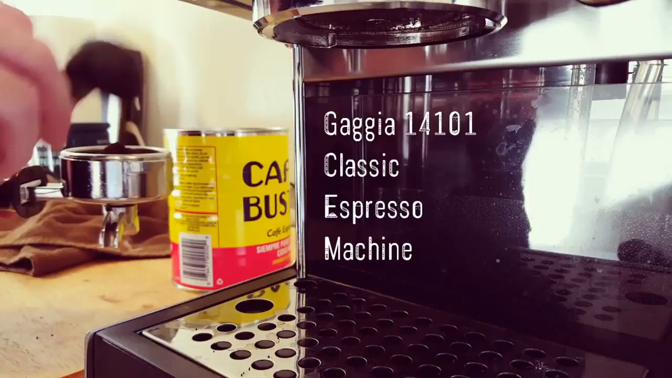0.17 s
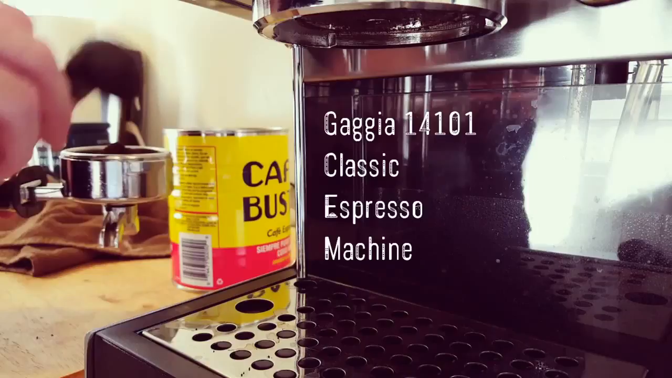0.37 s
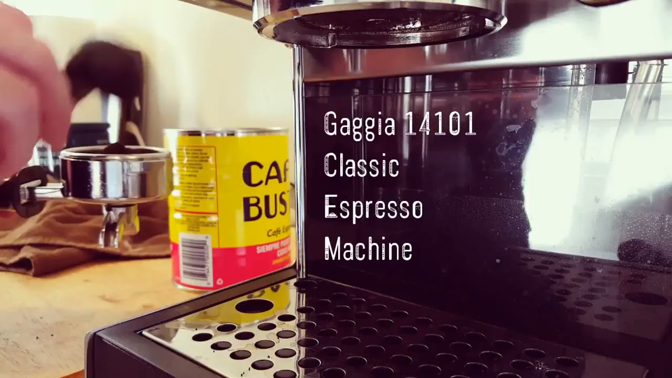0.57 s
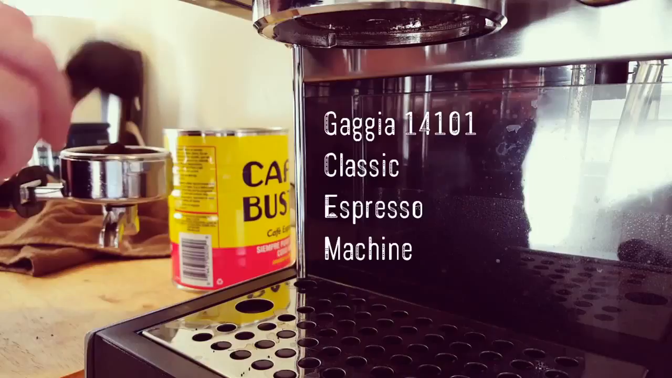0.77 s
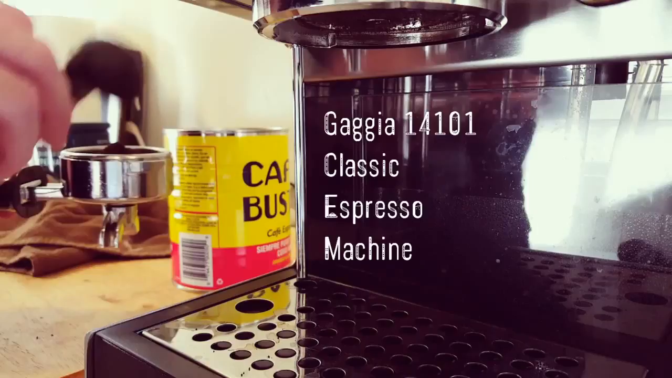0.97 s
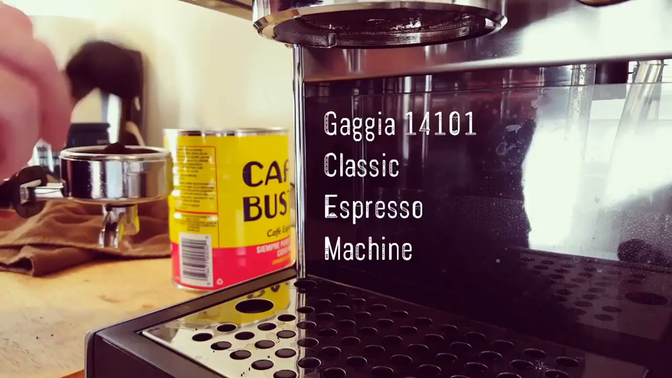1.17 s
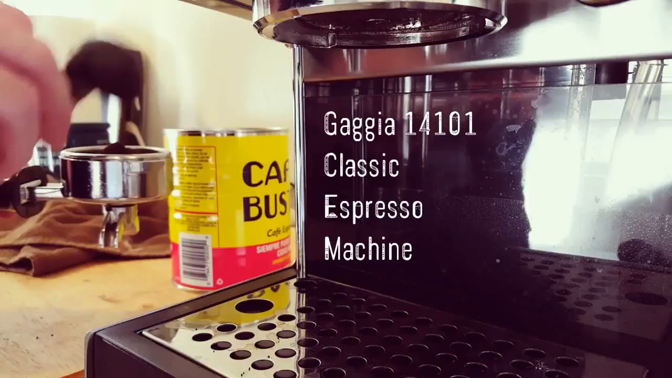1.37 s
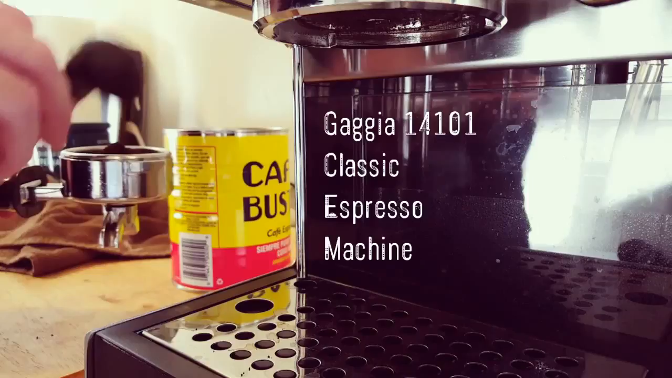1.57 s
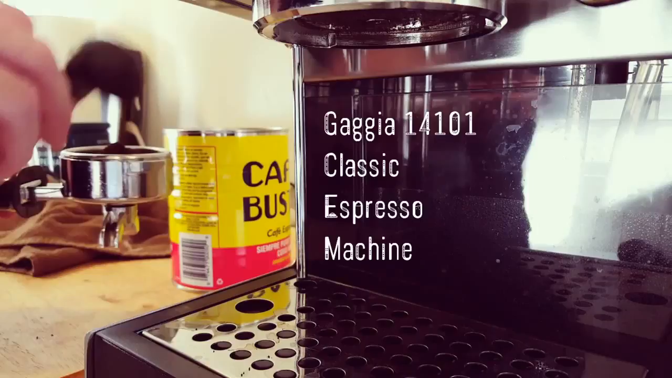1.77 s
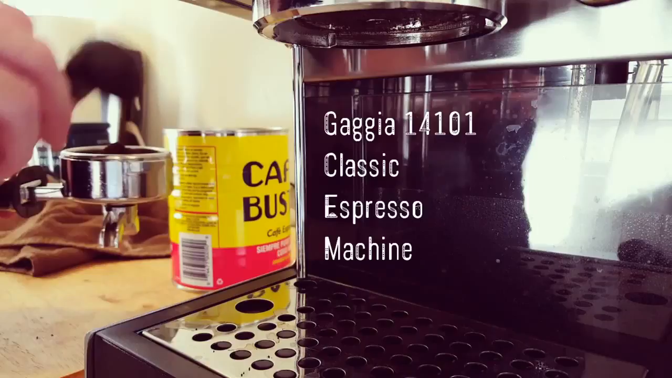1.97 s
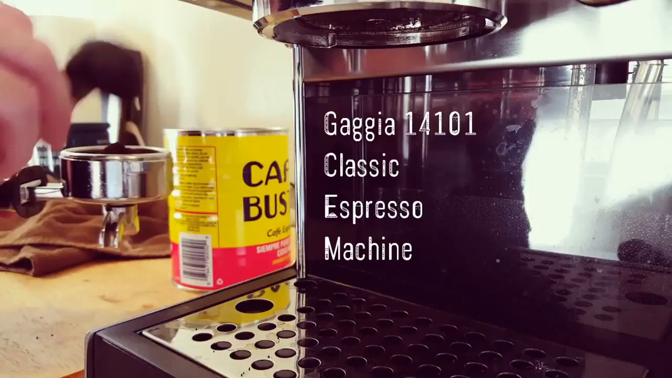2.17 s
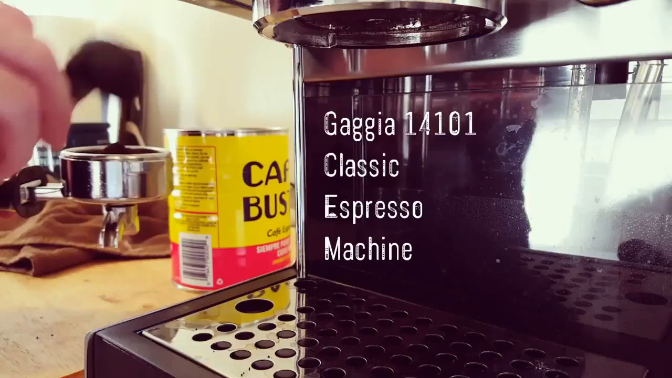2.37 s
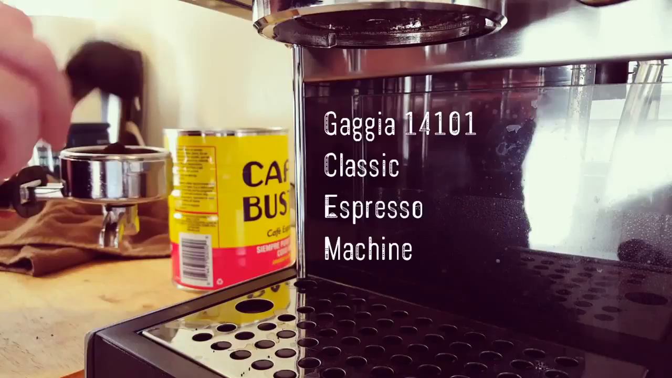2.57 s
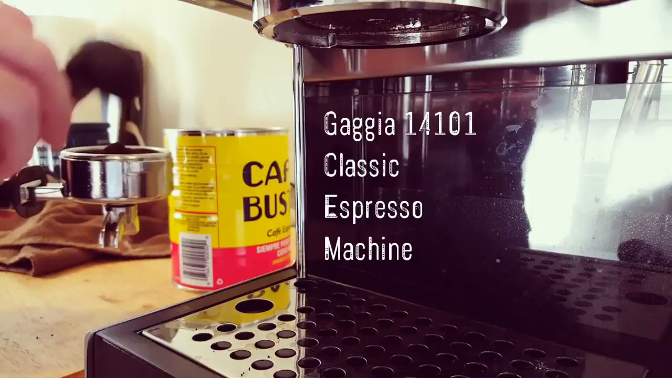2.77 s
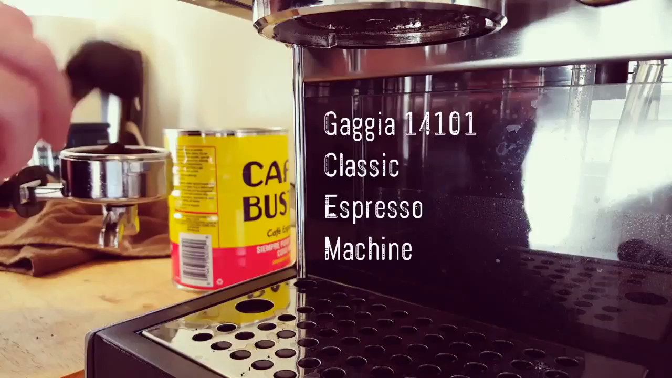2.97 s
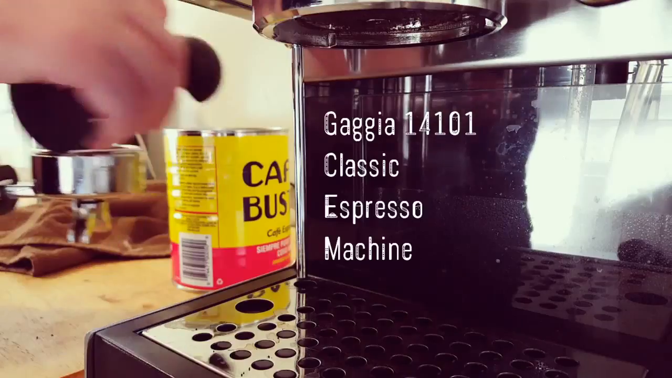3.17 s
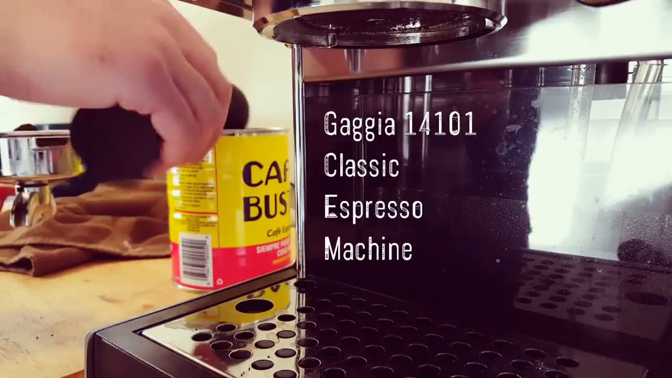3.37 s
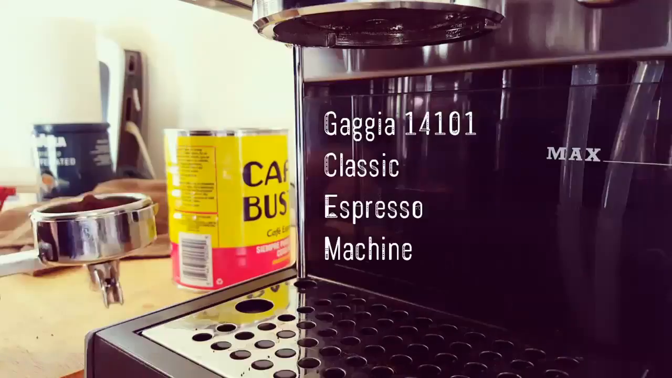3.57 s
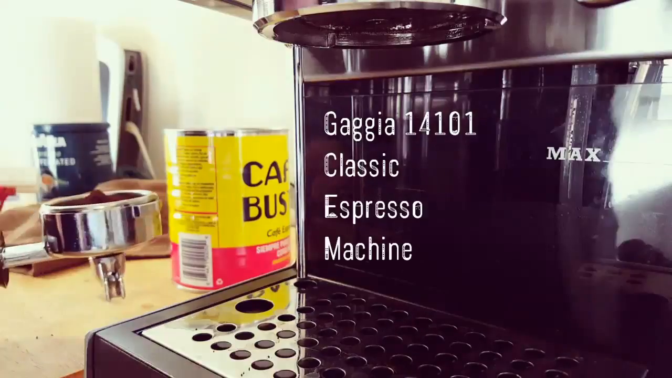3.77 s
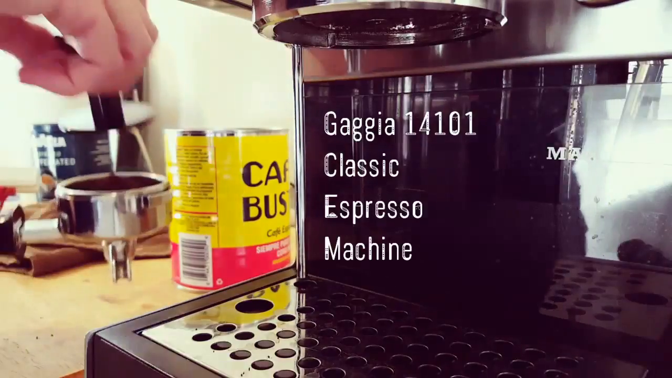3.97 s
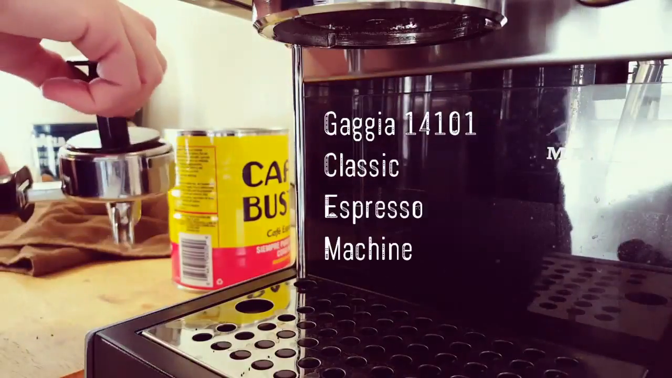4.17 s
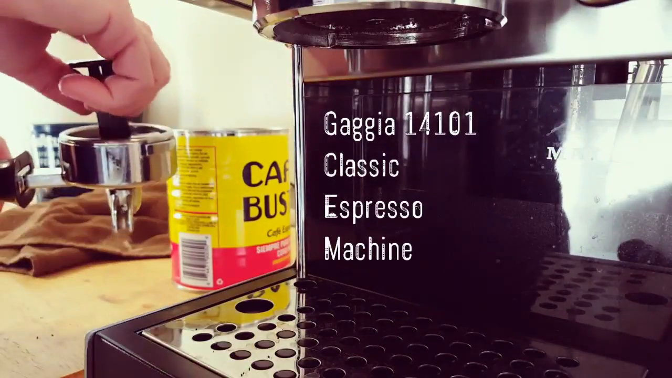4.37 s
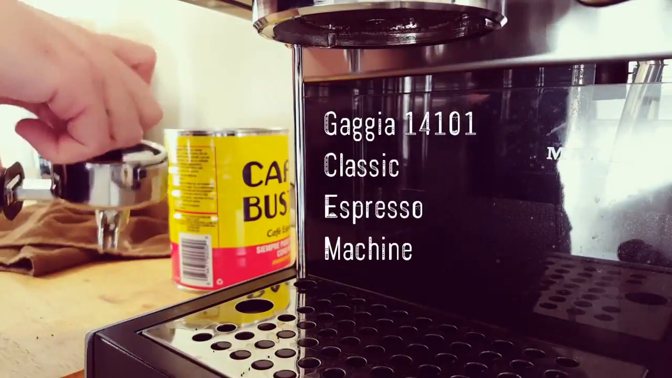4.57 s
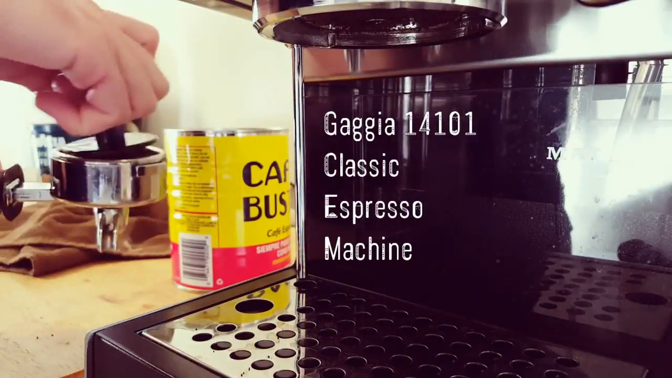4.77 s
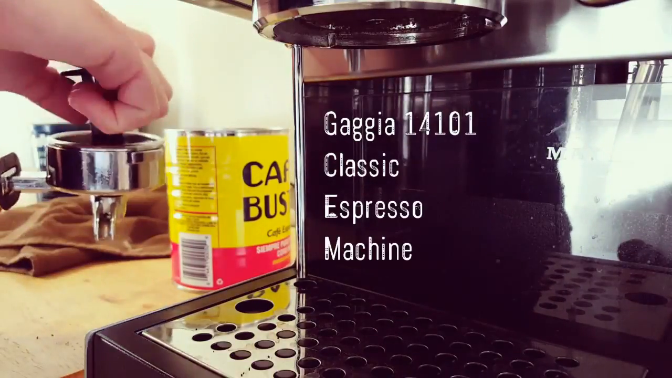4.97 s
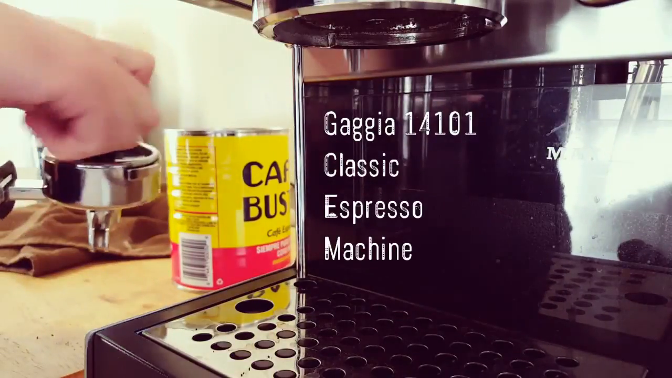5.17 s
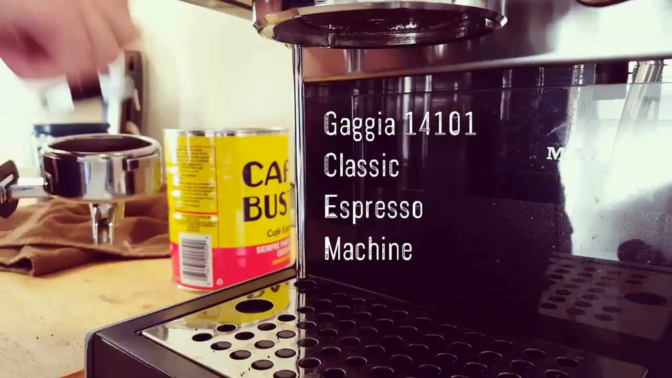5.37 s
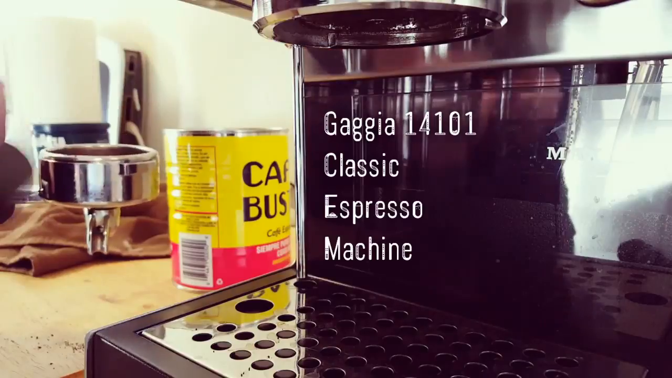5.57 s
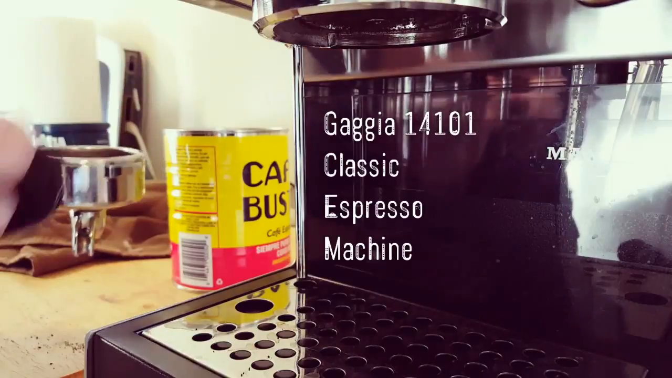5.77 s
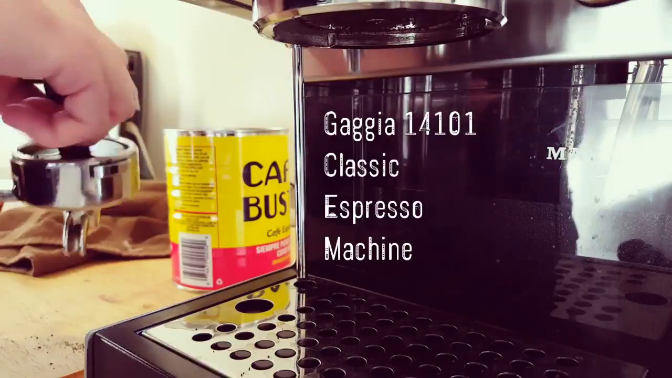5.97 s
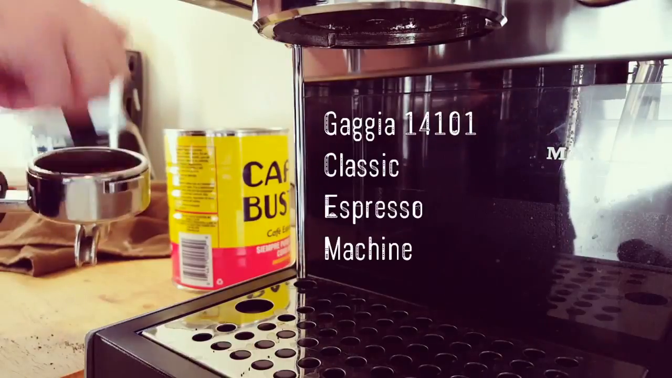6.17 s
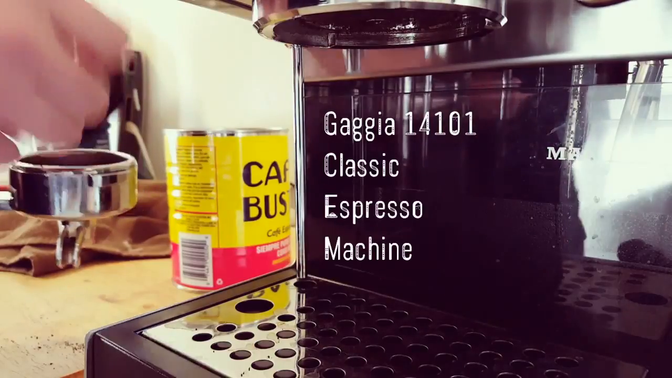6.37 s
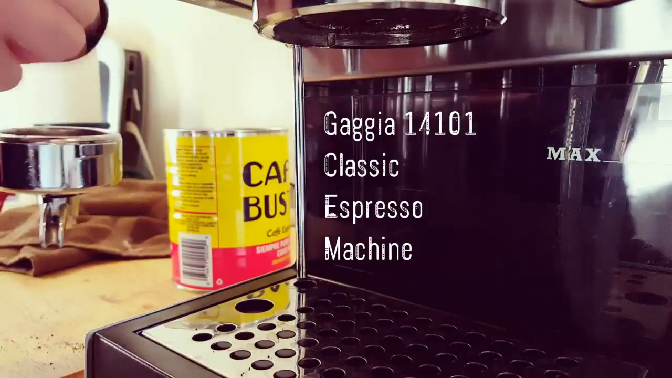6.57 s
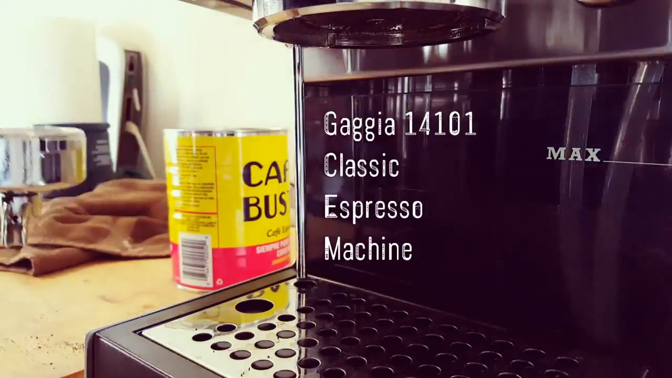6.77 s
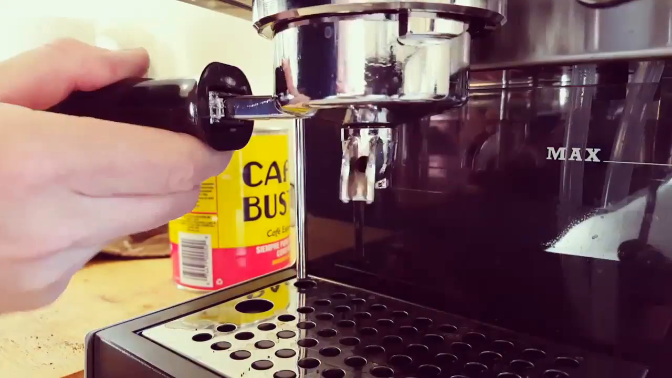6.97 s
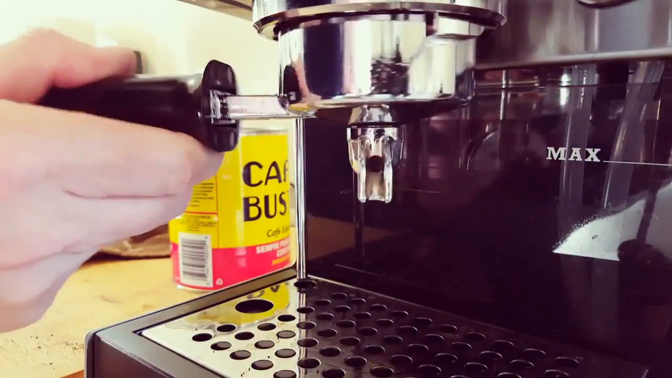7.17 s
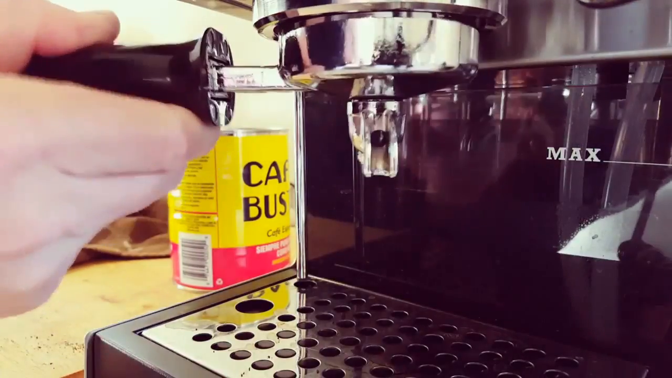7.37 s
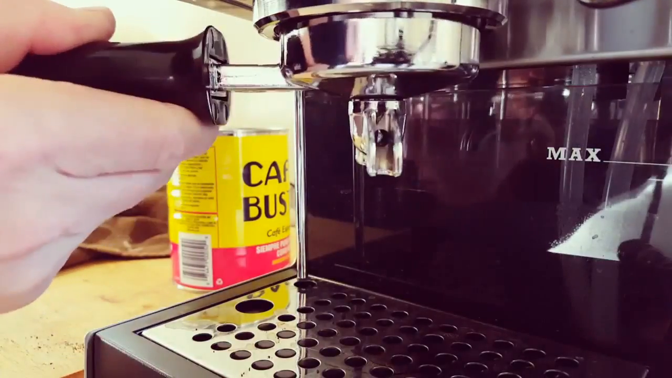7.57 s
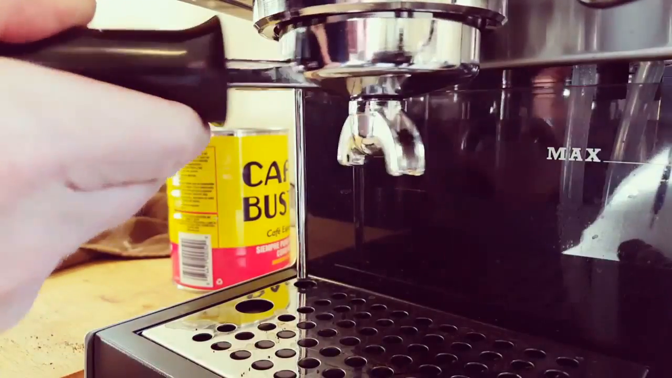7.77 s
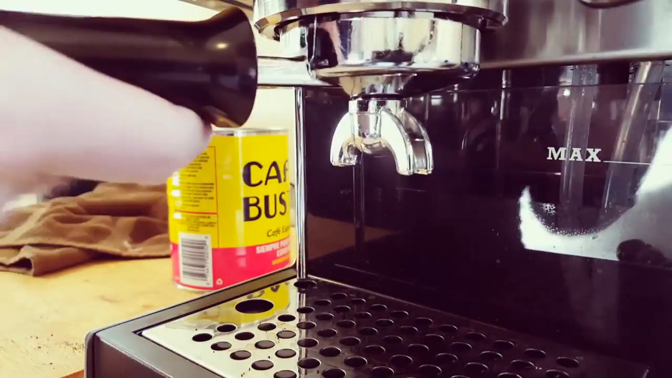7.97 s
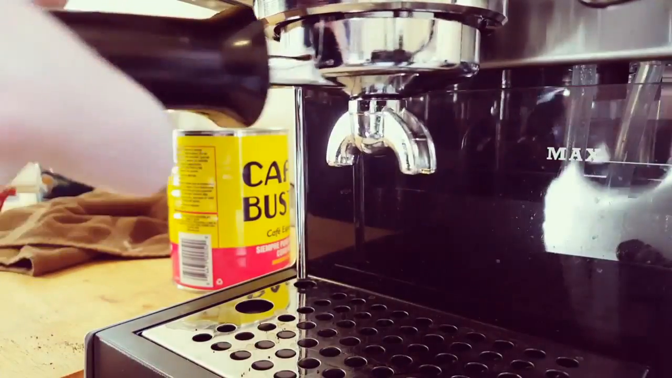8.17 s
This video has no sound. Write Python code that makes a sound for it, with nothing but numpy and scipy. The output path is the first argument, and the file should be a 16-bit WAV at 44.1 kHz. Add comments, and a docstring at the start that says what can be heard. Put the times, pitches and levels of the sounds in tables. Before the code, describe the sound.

Coffee-making handling heard close, slightly left, with short room reflections. Low air and a quiet unsteady hum sit underneath. Dull bumps lead to light bright taps of tin and scoop, then a gap, quickening hard taps on a metal basket, and three strong tin knocks. A scoop settles with muffled rubbing, faint grounds rustle, a tamper clicks, and metal lugs knock, grind and lock with a low casing boom.

```python
"""Small kitchen, two microphone ports a few centimetres apart, the taps arriving first at the left one.
Air and an appliance's wavering tones, then soft bumps; from 0.46 s tin knocks and scoop taps, at 2.5 s basket taps.
At 3.35 s the scoop is knocked clean on the tin and dropped in; it shifts there, and at 6.05 s the tamper taps.
From 6.93 s the handle is twisted into the machine with clunks and scraping, as the hum gives way to deeper air.
Blows are short forces on sets of resonances plus a crack and room; hum is sines, air and rubbing are noise."""
import sys
import numpy as np
from scipy import signal
from scipy.fft import rfft, irfft, next_fast_len
from scipy.io import wavfile
from scipy.ndimage import uniform_filter1d, map_coordinates

SR = 44100
rng = np.random.default_rng(int(sys.argv[2]) if len(sys.argv) > 2 else 0)


def generate_wav(sig):
    """Save sig (samples, or channels by samples) to the path in sys.argv[1] as 16-bit PCM at SR."""
    pcm = np.round(np.clip(np.atleast_2d(sig).T, -1, 1) * 32767).astype(np.int16)
    wavfile.write(sys.argv[1], SR, pcm)


def elevation(decibels):
    """Turn decibel levels (scalar or array-like) into linear amplitude ratios."""
    levels = np.asarray(decibels, float)
    return 10 ** (levels / 20)


N = 362502


def unit(x):
    """Scale to rms 1."""
    return x / np.sqrt(np.mean(x ** 2) + 1e-20)


def along(points, hz):
    """Read a curve of (f/Hz, value) points on a log frequency axis."""
    f, v = np.transpose(points)
    return np.interp(np.log(hz + 1), np.log(f + 1), v)


def gains(rows):
    """A (t/s, level/dB) curve as gain per sample, -120 dB outside the table."""
    s, db = np.transpose(rows)
    return elevation(np.interp(np.arange(N) / SR, s, db, -120, -120))


def strokes(rows, rise_db_per_s, fall_db_per_s):
    """Gain of movements (t/s, hold/s, level/dB) that swell to their level, hold it and die away."""
    t = np.arange(N) / SR
    total = 0
    for start, hold, db in rows:
        before = np.maximum(start - t, 0)
        after = np.maximum(t - start - hold, 0)
        total = total + elevation(db - rise_db_per_s * before - fall_db_per_s * after)
    return total


def wobble(rate):
    """A smooth random curve, rate knots a second."""
    knots = rng.standard_normal(int(N * rate / SR) + 4)
    return map_coordinates(knots, [np.arange(N) * rate / SR])


def filtered(x, response):
    """x times a complex response of frequency."""
    m = next_fast_len(x.shape[-1] + 8192)
    spectrum = rfft(x, m) * response(np.fft.rfftfreq(m, 1 / SR))
    return irfft(spectrum, m)[..., :x.shape[-1]]


def modes(table, scatter_db=0):
    """Causal response of resonances (f/Hz, width/Hz, level/dB), each excited a little differently."""
    scatter = scatter_db * rng.standard_normal(len(table))

    def warp(hz):  # bilinear frequency warping
        return SR / np.pi * np.tan(np.pi * np.minimum(hz / SR, .4999))

    def response(hz):
        f = warp(hz)
        total = 0
        for k, (centre, width, db) in enumerate(table):
            c = warp(centre)
            w = warp(centre + width / 2) - warp(centre - width / 2)
            resonance = 1j * f * w / (c * c - f * f + 1j * f * w)
            total = total + (-1) ** k * elevation(db + scatter[k]) * resonance
        return total

    return response


# how alike a diffuse field is at the two ports: f/Hz, likeness (1 = identical)
PORT_LIKENESS = [(60, 0.98), (130, 0.92), (290, 0.99), (640, 0.73), (1410, 0.33), (3100, -0.087),
                 (6820, -0.093), (15000, -0.11)]


def half_angle(hz):
    """Mixing angle that gives two signals the likeness of the ports."""
    return np.arccos(np.clip(along(PORT_LIKENESS, hz), -1, 1)) / 2


def ports(pair):
    """Two unrelated signals mixed as a diffuse field reaches the ports: alike in the bass only."""
    mid, side = filtered(pair, lambda hz: np.array([np.cos(half_angle(hz)), np.sin(half_angle(hz))]))
    return np.array([mid + side, mid - side])


def rush(spectrum, patchy_db):
    """Diffuse noise of rms 1 with smooth patches of random gain over time and frequency."""
    z = signal.stft(rng.standard_normal((2, N)), nperseg=512)[2]
    field = uniform_filter1d(rng.standard_normal(z.shape[1:]), size=6, axis=0)
    field = uniform_filter1d(field, size=14, axis=1)
    pair = signal.istft(z * elevation(patchy_db * unit(field)), nperseg=512)[1][:, :N]
    return unit(ports(filtered(pair, lambda hz: elevation(along(spectrum, hz)))))


# dying time of the room's answer: f/Hz, t60/s
KITCHEN_T60 = [(200, 0.44), (500, 0.16), (1300, 0.13), (3500, .16), (9000, 0.13), (16000, 0.13)]


def kitchen(x):
    """A fresh answer of the walls, each frequency dying at its own speed."""
    hz, t, z = signal.stft(rng.standard_normal((2, SR // 4)), SR, nperseg=256)
    decay = elevation(-60 * t / along(KITCHEN_T60, hz)[:, None])
    tail = ports(signal.istft(z * decay, SR, nperseg=256)[1])
    tail *= np.clip(np.arange(tail.shape[1]) / SR / .004, 0, 1)  # builds up as more surfaces join
    return signal.fftconvolve(x[None], tail / np.linalg.norm(tail[0]), axes=1)


def peak_one(x):
    """Scale to peak 1."""
    return x / abs(x).max()


def blows(events, body, crack, crack_db, crack_grows, lag_s, rough=0, scatter_db=1.5):
    """Each contact pushes the body's modes with a short force, cracks and fills the room."""
    firm_blow_db = -10  # strength at which the crack has its stated level
    out, t = np.zeros((2, N + SR)), np.arange(SR // 5) / SR
    for s, db, pan_db, room_db, ms in events:
        force = np.exp(-1000 * t / ms) * (1 + rough * rng.standard_normal(len(t)))
        ring = filtered(force, modes(body, scatter_db))
        grit = (t == 0) + 0.25 * np.exp(-t / 0.0015) * rng.standard_normal(len(t))
        snap = filtered(grit, modes([(*crack, 0)]))
        share = elevation(crack_db + crack_grows * (db - firm_blow_db))
        dry = elevation(db) * np.array([peak_one(ring), share * peak_one(snap)])
        # no deep bass, soft top
        dry = filtered(dry, lambda hz: (1j * hz / (70 + 1j * hz)) ** 2 / (1 + 1j * hz / 14000))
        # ring and crack radiate in different directions, so each gets its own room answer
        heard = elevation(room_db) * (kitchen(dry[0]) + kitchen(dry[1]))
        pan = elevation([[pan_db / 2], [-pan_db / 2]])
        # the right port hears the blow lag_s later
        heard[:, :len(t)] += filtered(
            sum(dry), lambda hz: pan * np.exp(-2j * np.pi * hz * [[0], [lag_s]]))
        out[:, round(s * SR):][:, :heard.shape[1]] += heard
    return out[:, :N]


def rubbed(body, lumps_db, rate):
    """Uneven friction feeding a body's resonances, partly through the room; rms 1."""
    friction = elevation(lumps_db * wobble(rate)) * rng.standard_normal(N)
    drag = filtered(friction, modes(body))
    direct = drag * elevation([[1.1], [-1.1]])
    return unit(direct + elevation(4.5) * kitchen(drag)[:, :N])


# colour of the input noise: f/Hz, relative level/dB
HISS_COLOUR = [(1000, 22.5), (4000, -36.5), (9000, 4), (15500, 19), (16500, -12)]


def input_hiss():
    """Steady coloured noise, unrelated in the two channels."""
    noise = rng.standard_normal((2, N))
    return elevation(-70.0) * unit(filtered(noise, lambda hz: elevation(along(HISS_COLOUR, hz))))


# tones of the appliance: f/Hz, relative level/dB
HUM_TONES = [(209.9, -62.5), (236.9, -54.5), (285.3, -54.5), (355.3, -62), (425.3, -64), (473.7, -60),
             (721.4, -62.5), (823.6, -64), (1152, -64.5), (1416, -84), (1647, -70), (2471, -75),
             (2724, -68), (3887, -75.5)]


def appliance_hum():
    """Sines whose phase and level waver at random, phased apart between the ports."""
    t = np.arange(N) / SR
    hum = 0
    for hz, db in HUM_TONES:
        phase = 2 * np.pi * (hz * t + rng.random()) + 1.15 * wobble(4) + 0.56 * wobble(15)
        apart = half_angle(hz)
        hum = hum + elevation(db + 2.45 * wobble(9)) * np.sin(phase + np.array([[apart], [-apart]]))
    return elevation(-49) * unit(hum)


# a soft low drone: f/Hz, relative level/dB
DRONE_COLOUR = [(85, -15), (108, -7), (118, -2.5), (130, -5), (160, -44)]


def low_drone():
    """A narrow band of patchy diffuse noise in the bass."""
    return elevation(-69.5) * rush([(20, -120)] + DRONE_COLOUR + [(300, -120)], patchy_db=2.5)


# kitchen air while the hum sounds: f/Hz, relative level/dB
AIR_COLOUR = [(15, -72), (25, -24), (111, -31), (177, -12), (226, -6.5), (280, -3.5), (378, -7.5),
              (470, -9.5), (510, -9.5), (1180, -11), (1280, -16.5), (3700, -25), (7110, -30), (15200, -41),
              (16500, -60)]


def room_air():
    """Broad diffuse noise, strongest in the low middle."""
    return elevation(-49.5) * rush(AIR_COLOUR, patchy_db=.5)


# deeper air after the hum: f/Hz, relative level/dB
LATE_AIR_COLOUR = [(15, -59), (25, -38), (142, -4), (280, -14.5), (483, -18.5), (524, -13.5), (706, -36),
                   (1320, -25), (1640, -34), (2090, -30.5), (3910, -37.5), (12600, -48.5), (16500, -66)]


def background():
    """Air, hum and drone; at 6.95 s they fade within 0.05 s into a deeper air."""
    late = np.clip((np.arange(N) / SR - 6.95) / .05, 0, 1)
    early_sound = room_air() + appliance_hum() + low_drone()
    late_sound = elevation(-46) * rush(LATE_AIR_COLOUR, patchy_db=2.5)
    return np.sqrt(1 - late) * early_sound + np.sqrt(late) * late_sound


# a fingertip or rim catches: t/s, level/dB
FINGER_FLICKS = [(.124, -51.5), (.26, -55), (3.925, -62), (4.255, -65), (4.86, -60), (5.43, -59),
                 (7.862, -49.5)]
# fingers on grounds and handle: t/s, hold/s, level/dB
FINGER_BRUSHES = [(3.78, .12, -59), (4.345, .012, -64), (4.745, .015, -54.5), (5.16, .025, -57.5),
                  (5.27, .03, -60), (6.16, 0.021, -56), (6.25, 0.038, -58.5), (6.33, .06, -68),
                  (7.73, 0.027, -62), (7.93, 0.025, -55.5), (8.02, .12, -68)]
# colour of that rustle: f/Hz, relative level/dB
RUSTLE = [(2000, 0), (4000, -1), (6500, 5), (9500, -4.5), (13000, 0), (16000, -21)]


def brushing():
    """Fingers and tamper brush the grounds: lumpy diffuse noise under short swells."""
    flicks = strokes([(s, 0, db) for s, db in FINGER_FLICKS], rise_db_per_s=2500, fall_db_per_s=400)
    brushes = strokes(FINGER_BRUSHES, rise_db_per_s=254, fall_db_per_s=202)
    rustle = unit(elevation(2.7 * wobble(120)) * rush(RUSTLE, patchy_db=0.5))
    return (flicks + brushes) * rustle


# soft bumps: t/s, level/dB, left-right/dB, room/dB, force decay/ms
COUNTER_BUMPS = [(0.126, -32.5, 0, -3, 0.16), (0.179, -26, -1.5, -1, 0.45), (0.204, -36, -0.6, -9, 0.39),
                 (0.262, -35, 0, -4, 0.23), (1.599, -28.5, 1.5, -2.5, 0.11)]
# resonances of the counter: f/Hz, width/Hz, relative level/dB
COUNTER_MODES = [(330, 54, 1.5), (486, 100, 1.5), (667, 54, -1), (830, 76, 1.5), (1370, 560, -12),
                 (2020, 360, -3.5)]


def counter_bumps():
    """Dull, slightly rough pushes on the low modes of the counter."""
    return blows(COUNTER_BUMPS, COUNTER_MODES, crack=(2500, 4000), crack_db=1.5, crack_grows=0.86,
                 lag_s=.0001, rough=0.11)


# tiny metal contacts: t/s, level/dB, f/Hz
METAL_TICKS = [(0.1276, -43, 6090), (0.264, -42, 5600), (1.2276, -43, 8080), (3.925, -25, 4400),
               (4.2533, -37, 7000), (4.356, -44, 5940), (4.8606, -32.5, 7200), (7.03, -42, 5580),
               (7.33, -28.5, 5450), (7.333, -28, 12700), (7.383, -40, 8580), (7.392, -31, 4460),
               (7.4051, -31, 5700), (7.406, -31, 12500), (7.4235, -30, 6300), (7.863, -45, 6160)]


def ticks():
    """Tiny metal contacts, each with one short ring of its own."""
    return sum(blows([(s, db, 0, -4, .03)], [(hz, 280, 0)], crack=(7000, 8000), crack_db=-0.5,
                     crack_grows=0, lag_s=0.00015) for s, db, hz in METAL_TICKS)


# knocks on the tin: t/s, level/dB, left-right/dB, room/dB, force decay/ms
KNOCKS_ON_TIN = [(0.4604, -16, 5.3, -8.5, 0.12), (0.4924, -21.5, 2.3, -18, 0.089),
                 (0.5254, -37, 1.1, 4, 0.05), (3.35, -2, 0.6, -5.5, 0.029),
                 (3.4538, -5.5, 0.6, -0.6, 0.082), (3.5597, -3.5, 1, 0.5, 0.11)]
# resonances of the tin: f/Hz, width/Hz, relative level/dB
TIN_MODES = [(376, 117, -9.5), (920, 250, -9), (1515, 330, -5), (2122, 360, 5), (2200, 20, 5),
             (2566, 44, -1.5), (2950, 570, 2), (3620, 770, -1.5), (4860, 590, -0.5), (6650, 330, 0.5),
             (8300, 580, -10), (11100, 2700, -7), (13800, 1800, -13.5)]


def tin_knocks():
    """Short blows ring the broad modes of the tin, with a bright crack."""
    return blows(KNOCKS_ON_TIN, TIN_MODES, crack=(6000, 9000), crack_db=-8, crack_grows=0.76,
                 lag_s=0.00013)


# taps of the scoop: t/s, level/dB, left-right/dB, room/dB, force decay/ms
TAPS_OF_SCOOP = [(0.4849, -20, -5, -6, 0.1), (0.7778, -9, 3.5, -6.5, 0.014), (0.8537, -8, 4, -3, 0.025),
                 (0.929, -6.5, 2.5, -3, 0.025)]
# resonances of the scoop: f/Hz, width/Hz, relative level/dB
SCOOP_MODES = [(800, 250, -12), (1410, 320, -8), (2500, 500, -12), (3800, 130, 2.5), (4210, 65, 8),
               (4780, 105, 8), (5100, 100, 7), (5450, 180, 0), (5680, 190, 5.5), (6240, 320, -5.5),
               (7500, 120, -2.5), (10160, 380, -6), (12300, 350, -27)]


def scoop_taps():
    """Hard light blows ring the scoop; harder ones crack more."""
    return blows(TAPS_OF_SCOOP, SCOOP_MODES, crack=(4500, 5000), crack_db=-2.5, crack_grows=1.07,
                 lag_s=.00016)


# taps on the basket: t/s, level/dB, left-right/dB, room/dB, force decay/ms
TAPS_ON_BASKET = [(2.49, -17.5, 5.5, -6, 0.081), (2.6543, -20, 6, -4, 0.088), (2.717, -19, 5, -5, 0.25),
                  (2.798, -7.5, 3.5, -6.5, 0.024), (2.8785, -8, 7, -3.5, 0.043),
                  (2.959, -6, 5.5, -3, 0.019), (3.0482, -4, -1, -2, 0.0096)]
# resonances of the metal filter basket: f/Hz, width/Hz, relative level/dB
BASKET_MODES = [(770, 280, -1.5), (1440, 240, 6), (2800, 870, 4), (3970, 320, 10.5), (5300, 430, 13.5),
                (6160, 110, -21), (6570, 180, 0.5), (12700, 410, -39), (15300, 540, -22)]


def basket_taps():
    """Hard light blows ring the filter basket's broad, quickly dying modes."""
    return blows(TAPS_ON_BASKET, BASKET_MODES, crack=(4400, 5000), crack_db=-6.5, crack_grows=0.51,
                 lag_s=0.00016)


# the scoop shifts in the grounds: t/s, hold/s, level/dB
SCOOP_SHIFTS = [(3.69, 0.035, -31), (3.778, 0.026, -32.5), (3.85, 0.085, -41.5), (4.02, 0.055, -46)]
# resonances of the tin's air space: f/Hz, width/Hz, relative level/dB
TIN_AIR_MODES = [(87, 38, -18), (124, 46, -9), (186, 57, -6), (274, 32.5, 4.5), (393, 65, -8),
                 (610, 143, -12), (806, 150, -15), (480, 93, -14)]


def scoop_settling():
    """The scoop shuffles in the tin: friction noise through the modes of its air space."""
    movement = strokes(SCOOP_SHIFTS, rise_db_per_s=450, fall_db_per_s=350)
    return movement * rubbed(TIN_AIR_MODES, lumps_db=0.0, rate=27)


# taps of the tamper: t/s, level/dB, left-right/dB, room/dB, force decay/ms
TAPS_OF_TAMPER = [(6.052, -6.5, 3, -8.5, 0.011), (6.236, -34, 0, -6, 0.03), (6.256, -24, -3, -12, 0.057)]
# resonances of the tamper: f/Hz, width/Hz, relative level/dB
TAMPER_MODES = [(1730, 400, -9.5), (2860, 180, 2), (4300, 220, -3), (5070, 150, 2), (5900, 130, 8.5),
                (6360, 450, 0.5), (7050, 240, -2), (7470, 100, -3), (10940, 630, -3.5)]


def tamper_taps():
    """Blows ring the tamper; softer ones have slightly more crack for their strength."""
    return blows(TAPS_OF_TAMPER, TAMPER_MODES, crack=(5000, 5000), crack_db=-6.5, crack_grows=-0.11,
                 lag_s=0.000124)


# resonances of the machine's casing: f/Hz, width/Hz, relative level/dB
MACHINE_MODES = [(87.3, 12.5, -2), (147.4, 22.5, -2), (223, 21, -6.5), (361.5, 30, 1.5), (527, 45, -1),
                 (607, 20, 0), (702, 123, -3), (828, 78, 0), (968, 120, -7), (1324, 75, -8),
                 (1830, 340, -18), (2140, 68, -12.5), (2660, 210, -16)]
# handle held against the machine: t/s, boom level/dB
HANDLE_TWIST = [(6.93, -50.5), (7.162, -48), (7.35, -49), (7.55, -54.5), (7.982, -54.5), (8.22, -57)]


def casing_boom():
    """The handle held against the machine rubs the nine lowest casing modes into a boom."""
    return gains(HANDLE_TWIST) * rubbed(MACHINE_MODES[:9], lumps_db=2, rate=90)


# lugs on the group head: t/s, level/dB, left-right/dB, room/dB, force decay/ms
LUG_CLUNKS = [(6.954, -25, -5, -1.5, 0.45), (7.032, -18, 2, -1, 0.15), (7.118, -29.5, 6, 4.5, 0.22),
              (7.134, -28.5, 7, -10, 0.49), (7.293, -27, -0.6, 12.5, 0.33), (7.331, -9.5, 2, -3, 0.81),
              (7.343, -16.5, 11, 3, 0.23), (7.354, -19, -0.6, -16, 0.5), (7.381, -38, -1.1, 1.1, 0.77),
              (7.392, -17, 1, -6, 0.51), (7.423, -11, 8, -8, 0.2), (7.435, -11.5, -3, -8.5, 0.2),
              (7.863, -18.5, 4, 0.6, 0.18)]


def lug_clunks():
    """The lugs knock on the group head: rough pushes on all the casing modes."""
    return blows(LUG_CLUNKS, MACHINE_MODES, crack=(2300, 3000), crack_db=-17, crack_grows=.05,
                 lag_s=.00002, rough=.3)


# lugs sliding: t/s, hold/s, level/dB
LUG_SCRAPES = [(7.125, .008, -52), (7.3, .025, -41), (7.335, 0.03, -36), (7.393, 0.041, -30.5),
               (7.45, 0.049, -48)]


def lug_scraping():
    """The lugs grind round: lumpy diffuse noise, strongest near 1.3 to 2.7 kHz."""
    colour = [(600, 0), (1300, 6), (2700, 1.0), (4000, -12.5), (7000, -13.5), (12000, -27), (16000, -36)]
    grit = rush(colour, patchy_db=1.0)
    sliding = strokes(LUG_SCRAPES, rise_db_per_s=1100, fall_db_per_s=800)
    return sliding * unit(elevation(2.5 * wobble(160)) * grit)


def scene():
    """Everything at the two ports."""
    handling = brushing() + counter_bumps() + ticks()
    taps = tin_knocks() + scoop_taps() + basket_taps() + scoop_settling() + tamper_taps()
    lock = casing_boom() + lug_clunks() + lug_scraping()
    return background() + handling + taps + lock


def top_cut(x):
    """Nothing passes above the cut-off."""
    return signal.sosfilt(signal.butter(12, 17180, fs=SR, output="sos"), x)


# colour difference of the ports: f/Hz, left-right/dB
PORT_COLOUR = [(100, -0.5), (250, -0.5), (700, 0.5), (2000, 1), (5000, 0.5), (9000, -1.5), (14000, -1.5)]


def record(dry):
    """The ports differ a little in colour; the input hisses, opens after a moment and has an offset."""
    heard = filtered(dry, lambda hz: elevation(along(PORT_COLOUR, hz) * [[.5], [-.5]]))
    opened = np.clip((np.arange(N) / SR - .035) / 0.002, 0, 1)  # silent for 35 ms, open 2 ms later
    mix = (heard + input_hiss() - .0006) * opened
    return top_cut(mix)


dry = scene()
out = record(dry)
generate_wav(out)
```